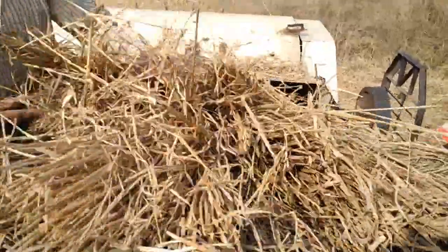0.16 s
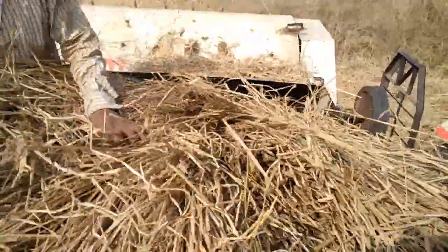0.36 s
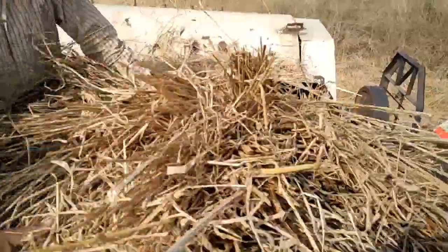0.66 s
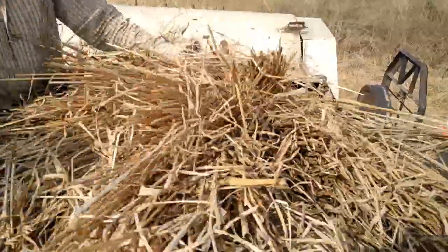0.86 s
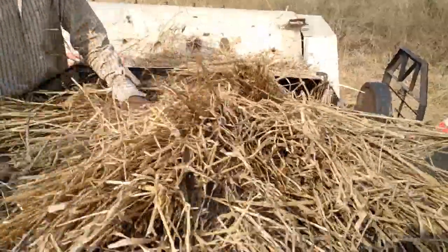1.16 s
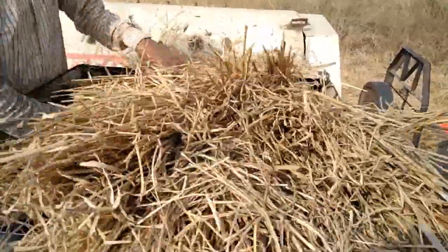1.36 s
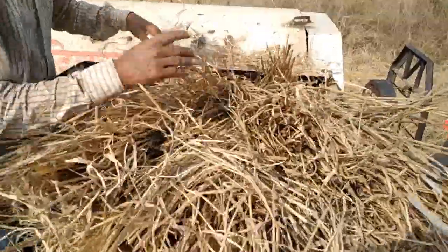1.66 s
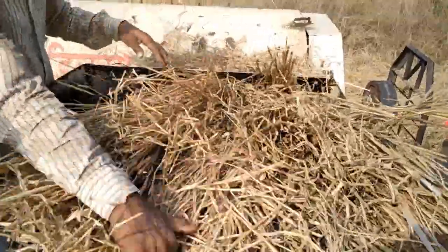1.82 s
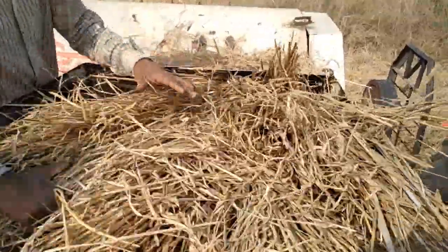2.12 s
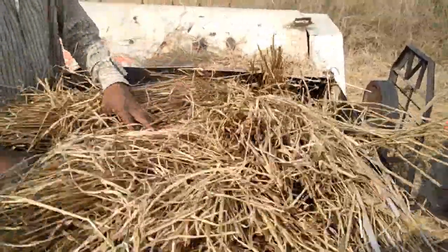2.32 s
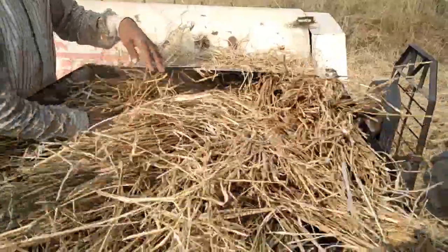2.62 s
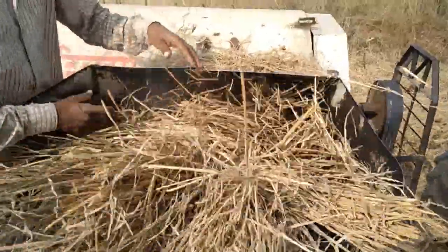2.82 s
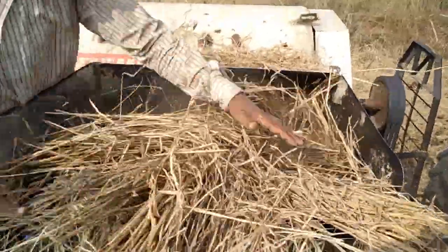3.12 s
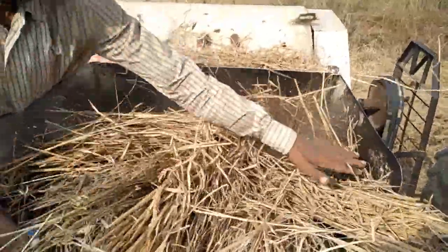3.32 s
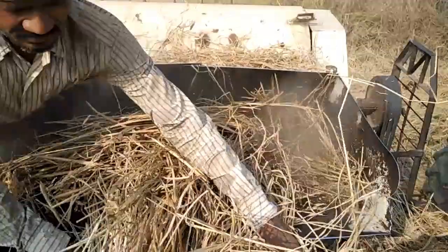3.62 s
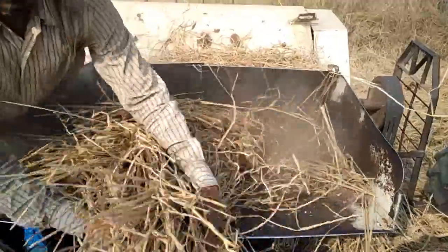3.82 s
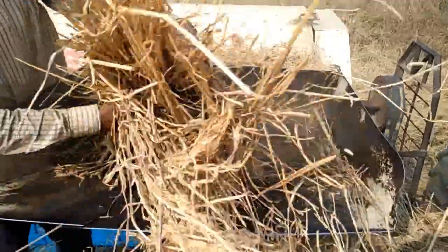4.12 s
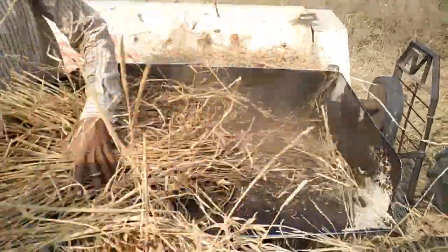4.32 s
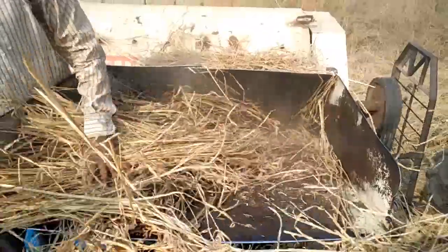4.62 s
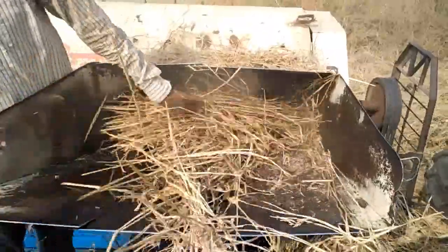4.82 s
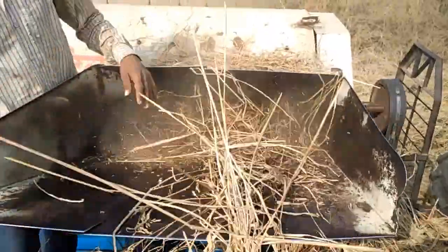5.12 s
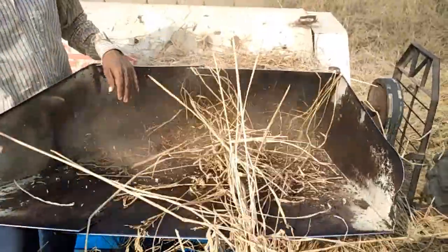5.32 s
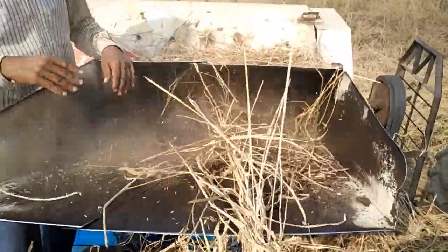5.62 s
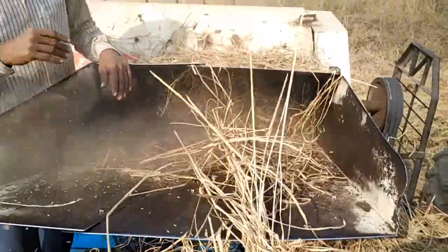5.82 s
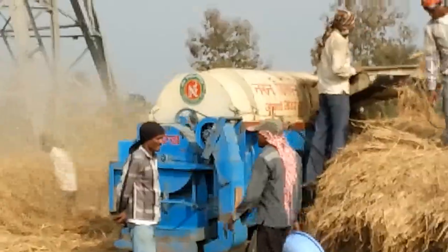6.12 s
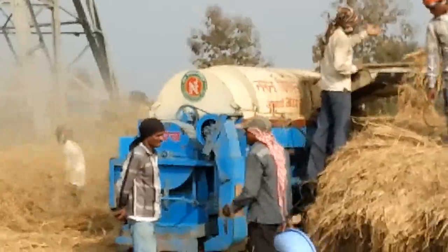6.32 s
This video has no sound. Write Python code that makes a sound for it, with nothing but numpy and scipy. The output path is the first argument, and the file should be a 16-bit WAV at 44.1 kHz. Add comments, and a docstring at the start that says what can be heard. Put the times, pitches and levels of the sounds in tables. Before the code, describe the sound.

A stereo microphone at arm's length from a threshing machine outdoors catches dense, dry, continuous noise: low casing rumble, a throaty growl as each straw bundle is swallowed, irregular thuds, metallic rattle and sizzling seed and chaff. Small gusts and dips keep it restless. The low roar eases midway, surges back, and the sound cuts off just before six seconds.

```python
"""Dry stalks are pushed into a crop thresher, heard at the feed hopper through two microphone ports. Beaters
boom the sheet-metal casing and bundles thump: shaped noise with impact envelopes, damped sines. The sieve
rattles as noise in impact envelopes, the feed throat growls as a moving resonance, a low tone hums. Noise bands
near 3 kHz and above swell and sink unevenly. Chaff and seed spray on the metal as a wide, bright hiss; then the
sound stops with a short faint tail."""
import sys
import numpy as np
from scipy import signal
from scipy.fft import irfft
from scipy.io import wavfile
from scipy.ndimage import uniform_filter1d

SR = 44100
rng = np.random.default_rng(int(sys.argv[2]) if len(sys.argv) > 2 else 0)


def wav_record(signal):
    """Record a signal, one row per channel, as 16-bit PCM in the file named by sys.argv[1]."""
    frames = np.transpose(np.atleast_2d(signal))
    bounded = np.clip(frames, -1, 1)
    # unit amplitude maps onto the largest positive 16-bit level
    quanta = np.round(bounded * 32767).astype(np.int16)
    wavfile.write(sys.argv[1], SR, quanta)


N = 284886
TIME = np.arange(N) / SR
FREQ = np.maximum(np.arange(N // 2 + 1) * SR / N, 1)
SIDES = np.array([[1], [-1]])  # left, right

# Drum under load. Each row: time in seconds, base levels in dB of boom, throat, casing drone, frame rumble.
DRUM_LOAD = [(0.0, -25, -20, -19, -30), (0.18, -20.5, -18, -22, -27.5), (0.57, -20.5, -26.5, -24.5, -31.5),
             (0.77, -24.5, -19, -22.5, -31), (1.1, -20, -22.5, -24, -30), (1.47, -21, -23.5, -24, -33.5),
             (1.55, -22, -21.5, -27, -35.5), (2.93, -22.5, -24.5, -24.5, -35.5),
             (2.96, -24.5, -33, -32.5, -48), (3.03, -29, -32.5, -28.5, -47), (3.26, -27, -24.5, -29, -34.5),
             (4.11, -24.5, -22, -26.5, -36), (4.32, -27.5, -25, -20.5, -39),
             (4.42, -21.5, -22.5, -25.5, -39), (5.67, -27, -26, -24, -34.5), (5.88, -23, -25, -30, -42)]
# Drum labours on a thick bundle or slips free. Each row: time in seconds, swell in dB of boom, of drone.
LOAD_SURGES = [(.22, 0, 2), (.37, 4, -3), (.48, 0, 1), (.81, 5, 2.5), (.9, -2.5, 2.5), (1.06, -2, -1.5),
               (1.15, 3, -1.5), (1.33, -4.5, -1), (1.44, 6, 3.5), (1.52, 0, -1), (1.61, 1.5, 1.5),
               (1.73, -5, 2), (1.81, -0.5, -1.5), (2.19, 2, 8), (2.32, -7.5, 0.5), (2.4, -5.5, 3.5),
               (2.48, -3.5, 1), (2.6, 3, 1.5), (2.7, 2.5, -1.5), (2.77, -8.5, -4), (2.87, -2, 2.5),
               (3.36, 6, 4), (3.48, 2, 4.5), (3.57, 1, 2), (3.729, 2, 3), (3.87, -7.5, 2.5),
               (3.96, 0.5, -4), (4.2, -2, 1), (4.4, 3.5, 2.5), (4.58, -0.5, -1), (4.69, 4, 3),
               (4.95, 1.5, 7), (5.07, -1, -0.5), (5.23, -1.5, -3), (5.35, -0.5, -6), (5.54, 6, -2.5),
               (5.82, 0, 4.5)]
# Growls as the throat swallows a bundle. Each row: time in seconds, centre in Hz, swell in dB,
# length to each side in seconds.
THROAT_GROWLS = [(0.129, 370, 4, 0.051), (0.236, 349.4, 2.5, 0.046), (0.811, 422, 7, 0.046),
                 (0.935, 449.6, 7, 0.032), (1.618, 422, 7.5, 0.059), (1.92, 370, 3, 0.039),
                 (2.226, 335.4, 10.5, 0.069), (2.412, 340, 10, 0.06), (2.596, 360.6, 7, 0.043),
                 (3.269, 362.3, 0, 0.038), (3.689, 345.6, 6, 0.056), (3.858, 354.6, 10.5, 0.05),
                 (3.998, 352.6, 4.5, 0.057), (4.45, 344.4, 11, 0.039), (4.723, 419.5, -0.5, 0.031),
                 (4.822, 417, 10.5, 0.041), (4.901, 440, 11, .05), (5.46, 346.6, -8, 0.06)]
# Casing modes. Each row: centre in Hz, width in Hz, height in dB above the broad body.
CASING_MODES = [(92, 14, 1.5), (193, 43, 1.5), (249, 18, 0.5), (332.2, 4.3, 6), (377.6, 9.1, -8.5),
                (420, 29, 0), (554, 40, -0.5), (718, 27, 3), (1044, 77, 4.5), (1654, 24, 8.5),
                (2260, 170, 0)]
# Broad casing response. Each row: frequency in Hz, relative density in dB per Hz.
CASING_BODY = [(15, -59), (25, -20.5), (195, 0), (277, -2), (340, -3), (546, -1.5), (643, -9), (790, -6.5),
               (1010, -12.5), (1220, -17.5), (1660, -23), (1800, -22.5), (2350, -21), (3130, -31),
               (3400, -53.5), (4420, -65), (7480, -120)]
# Spray of chaff and seed, opening up as the hopper empties.
# Each row: time in seconds, base levels in dB of fine hiss, of coarse hiss.
CHAFF_SPRAY = [(0.0, -23.5, -24.5), (0.15, -24.5, -31), (0.59, -23, -26), (1.03, -22.5, -32),
               (1.23, -20, -25), (2.37, -20.5, -24), (2.47, -19.5, -27.5), (2.85, -19, -19.5),
               (2.95, -17, -18.5), (3.19, -19, -22), (4.53, -18, -25.5), (4.73, -22, -26.5),
               (4.98, -17, -21.5), (5.85, -18, -26), (5.88, -18.5, -28)]
# Spray spectrum. Each row: frequency in Hz, relative density in dB per Hz.
SPRAY_SPECTRUM = [(1710, -49.5), (2900, -1.5), (3380, -11), (3960, -6.5), (4560, -7), (5790, -6),
                  (6570, -6), (8180, 1.5), (11900, -2), (13600, -4), (14200, -6)]
# Handfuls of chaff flung at the metal.
# Each row: time in seconds, swell in dB of coarse hiss, of fine hiss, of sieve rattle.
CHAFF_GUSTS = [(.1, 0, 4, -0.5), (.35, 4.5, 3, 2.5), (.61, 0, 3.5, -0.5), (.81, 3, 4.5, 0), (.9, 6, 3, -3),
               (1.28, 1, 3, 2), (1.45, 5, 0, 5.5), (1.68, 1.5, -3, 0), (1.92, 0.5, 2.5, 0),
               (2.08, 5.5, 1, 2.5), (2.35, 1.5, 1.5, 0), (2.41, 2, 3.5, -1), (2.63, 0, 1.5, -1.5),
               (2.88, 0, 1.5, 5), (3.36, 1, 2, 3), (3.52, 2, -0.5, 2.5), (3.71, -3.5, 1.5, 1.5),
               (3.85, -1, 0.5, 4), (4.18, 2.5, 3.5, 2.5), (4.36, 0, 2.5, 2.5), (4.5, 4, 3, -2),
               (4.82, 3.5, 2, 8), (5.14, 0, 2, 4.5), (5.29, 3, -0.5, 3), (5.63, 4.5, 0.5, 5.5),
               (5.78, 2.5, 2.5, 2.5)]
# Short gaps in the spray, mostly dips. Each row: time in seconds, level change in dB.
SPRAY_GAPS = [(.22, -0.5), (.52, -3), (1.01, -5), (1.37, -2.5), (1.58, -0.5), (1.87, -3), (2.25, -3),
              (2.54, -8.5), (2.78, -3), (3.22, -2), (3.46, -4), (3.58, -4), (3.97, -4), (4.69, -1.5),
              (4.76, 0.5), (5.47, 0)]
# Flares of the ringing hiss. Each row: time in seconds, swell in dB.
WHISTLE_FLARES = [(.435, 13), (.495, 11), (.54, 12), (.592, 20), (.625, 16), (.655, 9.5), (1.3, 8),
                  (1.674, 12), (1.9, 15), (2.041, 19.5), (2.07, 15), (3.53, 9), (4.154, 19), (4.805, 10),
                  (5.092, 17)]
# Bundles caught by the beaters. Each row: start in seconds, level in dB, pitch in Hz, ring T60 in seconds.
BUNDLE_THUMPS = [(0.008, -4, 366, 0.053), (0.04, 4, 175, 0.037), (0.135, -6, 205, 0.05),
                 (0.18, -4, 196, 0.065), (0.251, -4, 357, 0.041), (0.297, -6.5, 348, 0.06),
                 (0.444, -4, 206, 0.1), (0.535, -13, 195, 0.074), (0.72, -6, 453, 0.056),
                 (0.781, -4, 206, 0.063), (0.929, -13, 474, 0.067), (1.132, -3.5, 195, 0.1),
                 (1.215, -11, 241, 0.055), (1.361, -4, 197, 0.061), (1.4, -6, 248.3, 0.039),
                 (1.49, -9, 195, 0.15), (1.604, -7, 205, 0.099), (1.794, 1, 206, 0.051),
                 (1.84, -5.5, 212, 0.057), (1.878, -4, 189, 0.07), (1.994, -8, 317, 0.071),
                 (2.178, -0.5, 188, 0.044), (2.36, -8, 291, 0.062), (2.419, -6.5, 340, 0.072),
                 (2.636, -6, 250, 0.05), (2.819, -3, 180, 0.044), (2.852, -5, 544, 0.037),
                 (2.898, -10, 243, 0.05), (3.262, -8.5, 370, 0.064), (3.362, -4, 200.6, 0.057),
                 (3.51, -5, 186, 0.07), (3.562, -4, 429, 0.044), (3.963, -1, 353, 0.034),
                 (4.699, -4.5, 212.3, 0.06), (4.735, -3.5, 270, 0.054), (4.76, -6, 174.6, 0.06),
                 (4.86, -6, 180, 0.07), (5.451, -5.5, 345, 0.082), (5.503, -5, 186.5, 0.044)]
# Stiff stalk ends on the tray. Each row: start in seconds, level in dB, pitch in Hz, ring T60 in seconds.
STALK_RAPS = [(0.635, -19, 2320, 0.039), (0.9362, -18, 2330, 0.044), (1.6736, -20, 2410, 0.043),
              (2.0936, -14, 1980, 0.034), (3.908, -10, 1099, 0.035), (4.1687, -11, 1190, 0.042),
              (4.7201, -15, 1688, 0.035), (4.9282, -17.5, 2273, 0.037)]
# Power shared by the ports. Each row: frequency in Hz, squared likeness 0-1.
PORT_LIKENESS = [(25, .05), (60, 0.6), (85, 0.4), (120, 0.95), (290, 0.78), (620, 0.81), (1360, 0.12),
                 (2970, 0.01), (14200, 0.01)]
# Port balance. Each row: frequency in Hz, left minus right in dB.
PORT_LEAN = [(60, 2), (110, 0), (200, 0.5), (370, 1.5), (680, -0.5), (1250, 0), (2290, -1.5), (4210, 2.5),
             (7720, 8), (14200, -2)]

SHAFT_HZ, BEATERS = 6.25, 5
FRAME_TOP_HZ, BOOM_TOP_HZ, THROAT_TOP_HZ, DRONE_TOP_HZ = 124, 287.2, 565.6, 1202
SURGE_S = 0.041
LIFT_AT_S, LIFT_DB, LIFT_RISE_S, LIFT_FALL_S = 2.7, 0.5, .01, .07  # brief small rise of the drum
THROAT_HZ, THROAT_WANDER_HZ, THROAT_WIDTH_HZ = 344.3, 18, 32
HOLLOW_SHARE = .18  # power share of the air resonance before growls
WALLS_DB_PER_GROWL_DB, GROWL_RISE_HZ_PER_S = 0.25, 202
RATTLE_DB, RATTLE_DB_PER_DRONE_DB = -30, 0.23
FLICKER_HZ, FLICKER_TOP_HZ, FLICKER_DB = 2640, 3380, -11  # noise bands near 3 kHz
BAND_SWELL_TOP = .8  # cap on a band's swell, in spreads; sinking is uncapped
LOW_COARSE_HZ, LOW_COARSE_TOP_HZ, LOW_COARSE_DB = 3440, 4930, -7.5
COARSE_TOP_HZ, AIR_HZ, AIR_TOP_HZ = 7280, 10700, 16000
AIR_LEAN_DB, AIR_DB_PER_HISS_DB = 2, 0.63
PAN_DB_PER_HISS_DB = -0.65  # spray shifts rightward as it grows
GUST_RISE_S, GUST_FALL_S, GAP_S, FINE_PER_GAP = 0.011, 0.031, 0.027, 0.41
WHISTLE_HZ, WHISTLE_WIDTH_HZ, WHISTLE_DB = 5950, 550, -39
FLARE_RISE_S, FLARE_FALL_S = .011, .02
HUM_HZ, HUM_DB, HUM_WAVER_DB = 97.1, -42.5, 2.5
PORT_LAG_S = .00014
CUT_S, TAIL_DB, TAIL_T60_S = 5.8957, -13, 0.044
TOP_HZ = 14230


def undb(db):
    """Decibels to gain."""
    return 10 ** (np.asarray(db) / 20)


def curves(table):
    """Columns of a time table, one value a sample."""
    s, *columns = np.transpose(table)
    return [np.interp(TIME, s, c) for c in columns]


def over_hz(table):
    """A (Hz, value) table on the log-frequency axis."""
    hz, value = np.transpose(table)
    return np.interp(np.log(FREQ), np.log(hz), value)


def swell(s, rise_s, fall_s):
    """A Gaussian-sided bump of height 1 at time s."""
    return np.exp(-np.where(TIME < s, (s - TIME) / rise_s, (TIME - s) / fall_s) ** 2)


def walk(rate_hz):
    """Random levels held 1 / rate_hz s and slewed twice; spread near 1."""
    k = max(int(SR / rate_hz), 2)
    steps = np.repeat(rng.standard_normal(N // k + 1), k)
    return 1.7 * uniform_filter1d(uniform_filter1d(steps, k), k)[:N]


def ports(gain, lo_hz, hi_hz, steep=6):
    """Noise between soft edges, partly common to both ports by frequency; the port mean has rms 1."""
    edges = (1 + (lo_hz / FREQ) ** (2 * steep)) * (1 + (FREQ / hi_hz) ** (2 * steep))
    gain = gain / np.sqrt(edges)
    like = np.sqrt(np.clip(over_hz(PORT_LIKENESS), 0, 1))
    real, imag = rng.standard_normal((2, 3, len(FREQ)))
    common, left, right = real + 1j * imag
    lag = np.exp(-2j * np.pi * FREQ * PORT_LAG_S)  # left port hears later
    lean = undb(over_hz(PORT_LEAN) / 2)
    left_port = lean * lag * (np.sqrt(like) * common + np.sqrt(1 - like) * left)
    right_port = (np.sqrt(like) * common + np.sqrt(1 - like) * right) / lean
    x = irfft(gain * np.array([left_port, right_port]), N)
    return x / np.sqrt(np.mean(x.mean(0) ** 2))


def uneven_bands(gain, lo_hz, hi_hz, count, depth_db, rate_hz):
    """Neighbouring noise bands swell and sink independently at random; the port mean has rms 1."""
    edges = np.geomspace(lo_hz, hi_hz, count + 1)
    x = 0
    for lo, hi in zip(edges[:-1], edges[1:]):
        share = np.sqrt(np.sum(gain[(FREQ > lo) & (FREQ < hi)] ** 2))
        level = undb(depth_db * np.minimum(walk(rate_hz), BAND_SWELL_TOP))
        x = x + share * ports(gain, lo, hi, steep=13.0) * level
    return x / x.mean(0).std()


def narrow(hz, width_hz):
    """Noise in a narrow resonance whose centre may move; rms 1."""
    lowpass = signal.butter(2, width_hz / 2, fs=SR, output="sos")
    a, b = signal.sosfilt(lowpass, rng.standard_normal((2, N)))
    carrier = np.exp(2j * np.pi * np.cumsum(hz + 0 * TIME) / SR)
    x = np.real((a + 1j * b) * carrier)
    return x / x.std()


def blows(rate_hz, spread_db, decay_s):
    """Envelope of many uneven impacts, each dying exponentially; rms 1."""
    when, size = rng.random((int(rate_hz * N / SR), 2)).T
    size_db = np.minimum(-spread_db * np.log(1 - size), 12)
    hits = np.zeros(N)
    np.add.at(hits, (when * N).astype(int), undb(size_db) ** 2)
    power = signal.lfilter([1], [1, -np.exp(-2 / (decay_s * SR))], hits)
    return np.sqrt(power / power.mean())


def turning(turn_db, beat_db):
    """Level throb of the slightly wandering shaft: twice a turn and once a beater."""
    phase = 2 * np.pi * np.cumsum(SHAFT_HZ * (1 + .015 * walk(1.7))) / SR
    return undb(turn_db * np.sin(2 * phase) + beat_db * np.sin(BEATERS * phase))


def surges():
    """Swell in dB of the boom and the drone as the load changes."""
    return sum(np.outer(swell_db, swell(s, SURGE_S, SURGE_S)) for s, *swell_db in LOAD_SURGES)


def gusts():
    """Swell in dB of the coarse hiss, the fine hiss and the sieve."""
    flung_db = sum(np.outer(swell_db, swell(s, GUST_RISE_S, GUST_FALL_S)) for s, *swell_db in CHAFF_GUSTS)
    gap_db = sum(db * swell(s, GAP_S, GAP_S) for s, db in SPRAY_GAPS)
    return flung_db + np.outer([1, FINE_PER_GAP, FINE_PER_GAP], gap_db)


def growls():
    """Centre in Hz of the throat hollow and its swell in dB: it wanders, and each bundle retunes it."""
    centre_hz, swell_db = THROAT_HZ + THROAT_WANDER_HZ * walk(12), 0
    for s, hz, db, length_s in THROAT_GROWLS:
        bump = swell(s, length_s, length_s)
        target_hz = hz + GROWL_RISE_HZ_PER_S * (TIME - s)
        centre_hz = centre_hz + bump * (target_hz - centre_hz)
        swell_db = swell_db + db * bump
    return centre_hz, swell_db


def casing_response():
    """Gain of the sheet-metal casing: its modes stand on a broad body."""
    body = undb(over_hz(CASING_BODY))
    for hz, width_hz, db in CASING_MODES:
        body = body * undb(db / (1 + (2 * (FREQ - hz) / width_hz) ** 2))
    return body


def frame_rumble(body, level_db):
    """Slowly wavering noise in the lowest casing band."""
    return ports(body, 18, FRAME_TOP_HZ) * undb(level_db + 1.9 * walk(7))


def casing_boom(body, level_db):
    """Dense blows on stalks excite the low casing modes."""
    return ports(body, FRAME_TOP_HZ, BOOM_TOP_HZ) * blows(300, 0.76, 0.025) * undb(level_db)


def feed_throat(body, level_db):
    """Uneven noise bands for the walls plus a moving air resonance that growls."""
    centre_hz, growl_db = growls()
    walls = uneven_bands(body, BOOM_TOP_HZ, THROAT_TOP_HZ, count=3, depth_db=2.0, rate_hz=9)
    walls = walls * np.sqrt(1 - HOLLOW_SHARE) * undb(WALLS_DB_PER_GROWL_DB * growl_db)
    hollow = narrow(centre_hz, THROAT_WIDTH_HZ) * np.sqrt(HOLLOW_SHARE)
    hollow = hollow * undb(growl_db + 1.6 * walk(22))
    return (walls + hollow) * undb(level_db)


def casing_drone(body, level_db):
    """Denser blows excite the middle casing modes, in unevenly swelling bands."""
    metal = uneven_bands(body, THROAT_TOP_HZ, DRONE_TOP_HZ, count=6, depth_db=2.5, rate_hz=14)
    return metal * blows(600, 1.9, 0.012) * undb(level_db)


def sieve_rattle(body, level_db):
    """Quick impacts shape the rattle and, just above it, noise bands near 3 kHz that flicker unevenly."""
    sieve = uneven_bands(body, DRONE_TOP_HZ, FLICKER_HZ, count=6, depth_db=3, rate_hz=18)
    flicker_bands = uneven_bands(body, FLICKER_HZ, FLICKER_TOP_HZ, count=6, depth_db=8, rate_hz=20)
    return (sieve + flicker_bands * undb(FLICKER_DB)) * blows(900, 1.6, 0.015) * undb(level_db)


def drum():
    """Rumble, boom, throat, drone and sieve follow the load and throb with the shaft."""
    lift_db = LIFT_DB * swell(LIFT_AT_S, LIFT_RISE_S, LIFT_FALL_S)
    boom_db, throat_db, drone_db, frame_db = curves(DRUM_LOAD) + lift_db
    rattle_db = RATTLE_DB + gusts()[2] + RATTLE_DB_PER_DRONE_DB * (drone_db - drone_db.mean())
    boom_surge_db, drone_surge_db = surges()
    boom_db = boom_db + 0.35 * walk(11) + boom_surge_db
    drone_db = drone_db + 0.53 * walk(13) + drone_surge_db
    throat_db = throat_db + 0.61 * walk(12)
    body = casing_response()
    low = frame_rumble(body, frame_db) + casing_boom(body, boom_db) + feed_throat(body, throat_db)
    high = casing_drone(body, drone_db) + sieve_rattle(body, rattle_db)
    return (low + high) * turning(0.45, 0.22)


def fine_hiss(spray, level_db, pan):
    """Tiny strikes with a separate envelope at each port; the top opens further as the spray grows."""
    grit = np.array([blows(7800, 6.0, 0.0042) for _ in range(2)])
    opening_db = AIR_DB_PER_HISS_DB * (curves(CHAFF_SPRAY)[0] - level_db.mean())
    air_db = -2.5 + opening_db + 0.33 * walk(9.9) + AIR_LEAN_DB / 2 * SIDES
    air = ports(spray, AIR_HZ, AIR_TOP_HZ) * undb(air_db)
    hiss = ports(spray, COARSE_TOP_HZ, AIR_HZ) * undb(-4.0) * pan
    return (hiss + air) * grit * undb(level_db + 0.65 * walk(30))


def coarse_hiss(spray, level_db, pan):
    """Coarse hiss in a strike envelope; its lowest narrow bands fade in and out unevenly."""
    seed = np.array([blows(3500, 0.63, .004) for _ in range(2)])
    low = uneven_bands(spray, LOW_COARSE_HZ, LOW_COARSE_TOP_HZ, count=11, depth_db=11.5, rate_hz=22)
    high = uneven_bands(spray, LOW_COARSE_TOP_HZ, COARSE_TOP_HZ, count=5, depth_db=2.5, rate_hz=30)
    return (low * undb(LOW_COARSE_DB) + high * undb(-0.6)) * seed * undb(level_db) * pan


def ringing_hiss():
    """Narrow noise in uneven impacts, at the left port only, which flares up."""
    flare_db = sum(db * swell(s, FLARE_RISE_S, FLARE_FALL_S) for s, db in WHISTLE_FLARES)
    ring = narrow(WHISTLE_HZ, WHISTLE_WIDTH_HZ) * blows(1500, 9.8, 0.005)
    return ring * undb(WHISTLE_DB + flare_db) * np.array([[2], [0]])


def chaff():
    """Thousands of tiny strikes a second on the hopper, nearly unrelated at the two ports, in gusts."""
    fine_db, coarse_db = curves(CHAFF_SPRAY) + gusts()[1::-1]
    spray = undb(over_hz(SPRAY_SPECTRUM))
    pan = undb(PAN_DB_PER_HISS_DB * (fine_db - fine_db.mean()) / 2 * SIDES)
    throb = undb(0.26 * walk(18)) * turning(0.5, 0.4)
    hiss = fine_hiss(spray, fine_db, pan) + coarse_hiss(spray, coarse_db, pan)
    return hiss * throb + ringing_hiss()


def hum():
    """A nearly steady low tone that wavers in level."""
    phase = 2 * np.pi * np.cumsum(HUM_HZ * (1 + .012 * walk(4))) / SR
    return np.sqrt(2) * np.sin(phase) * undb(HUM_DB + HUM_WAVER_DB * walk(6))


def knocks(table, rise_cycles):
    """Each blow pushes the metal for a few cycles and lets it ring out as a damped sine."""
    out, t = np.zeros(N), np.arange(SR // 5) / SR
    for s, db, hz, t60_s in table:
        i = int(s * SR)
        push = 1 - np.exp(-t * hz / rise_cycles)
        out[i:i + len(t)] += undb(db - 60 * t / t60_s) * push * np.sin(2 * np.pi * hz * t)
    return out


def thumps():
    """Bundles hit by the beaters: low damped sines, quick to rise."""
    return knocks(BUNDLE_THUMPS, rise_cycles=0.88)


def raps():
    """Stalk ends on the tray: higher damped sines, rising over more cycles."""
    return knocks(STALK_RAPS, rise_cycles=3.5)


def scene():
    """The machine at arm's length."""
    return drum() + chaff() + hum() + thumps() + raps()


def record(dry):
    """Wind filter, overload of the highest peaks, abrupt stop with a short faint tail, top cut off."""
    x = signal.sosfilt(signal.butter(2, 30, "high", fs=SR, output="sos"), dry)
    after_s = np.maximum(TIME - CUT_S, 0)
    tail = undb(TAIL_DB - 60 * after_s / TAIL_T60_S)
    x = np.clip(x, -.74, .74) * np.where(after_s > 0, tail, 1)
    return signal.sosfilt(signal.ellip(14, .2, 80, TOP_HZ, fs=SR, output="sos"), x)


dry = scene()
out = record(dry)
wav_record(out)
```